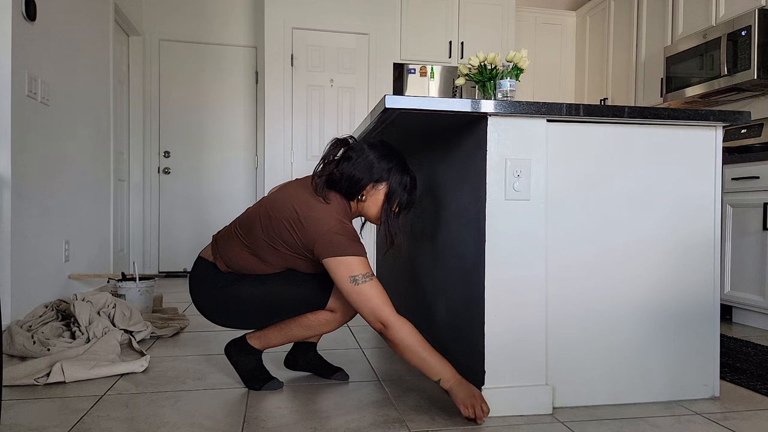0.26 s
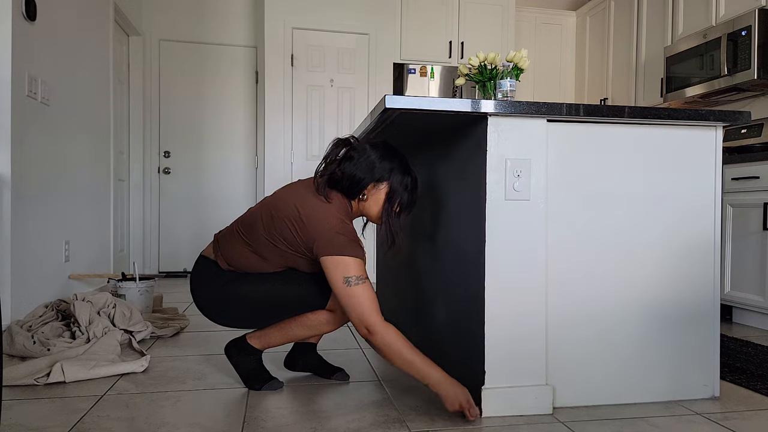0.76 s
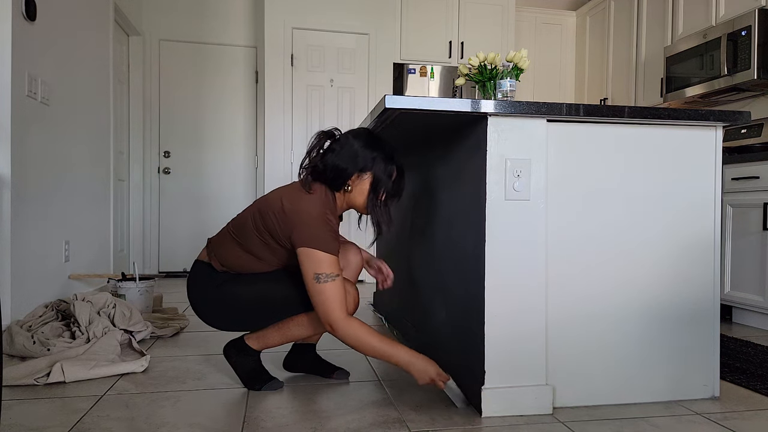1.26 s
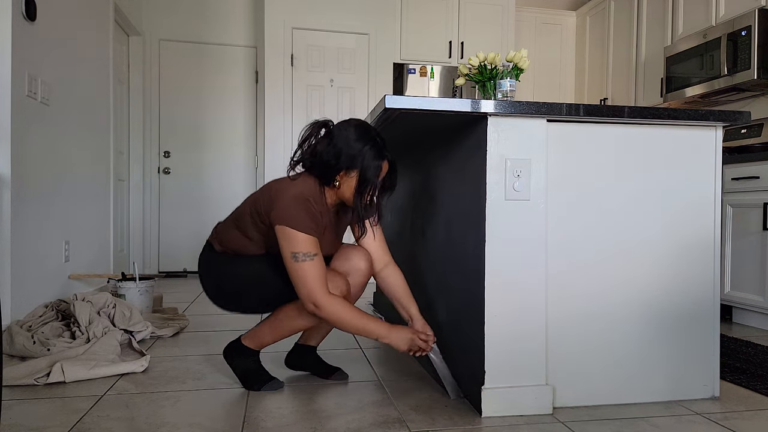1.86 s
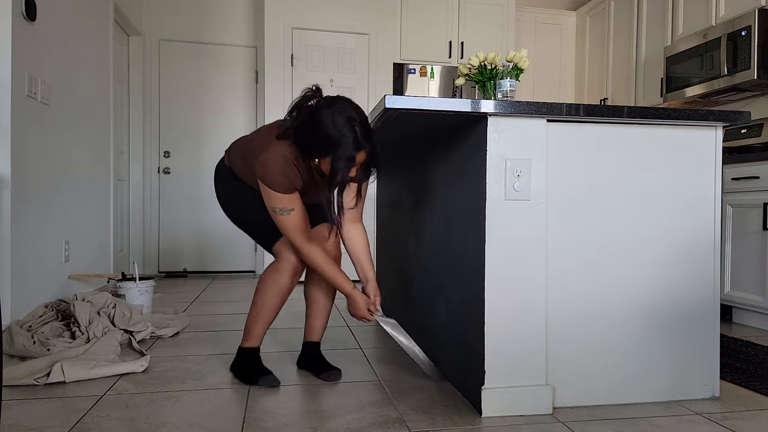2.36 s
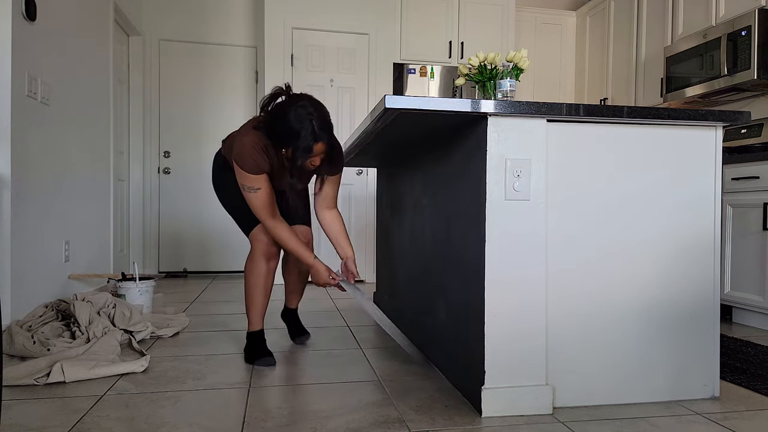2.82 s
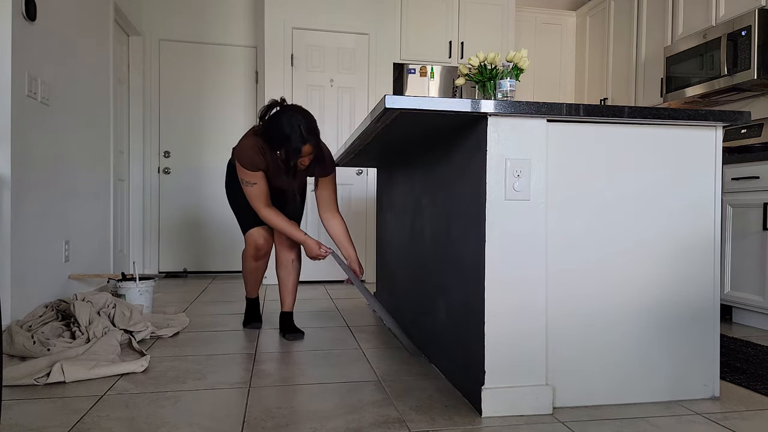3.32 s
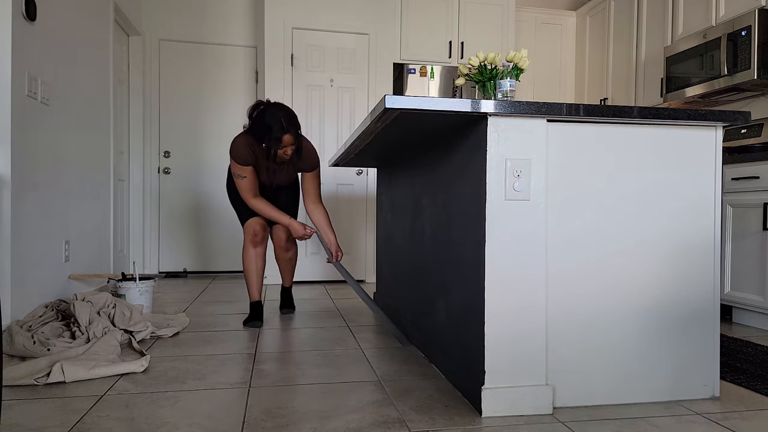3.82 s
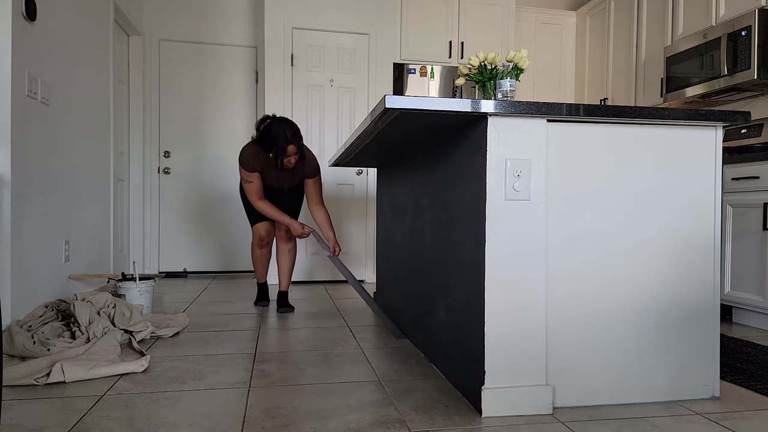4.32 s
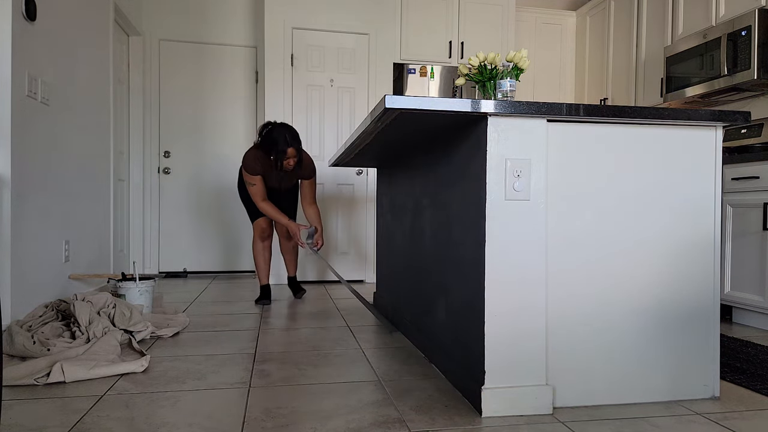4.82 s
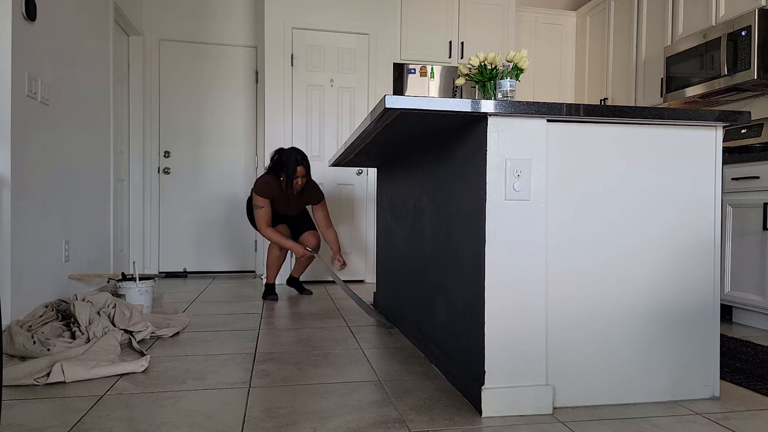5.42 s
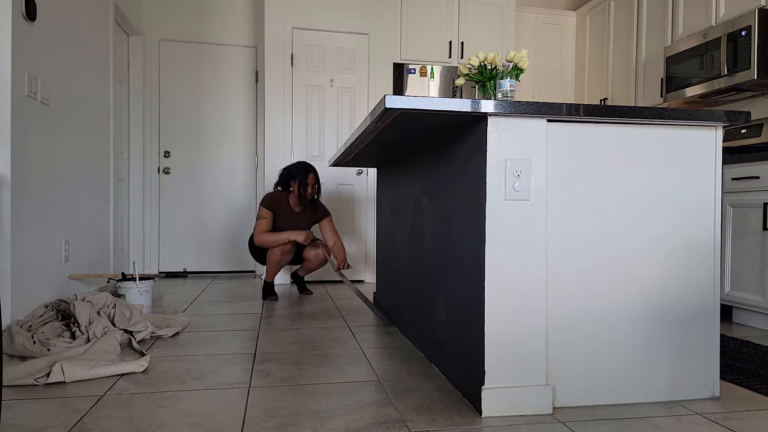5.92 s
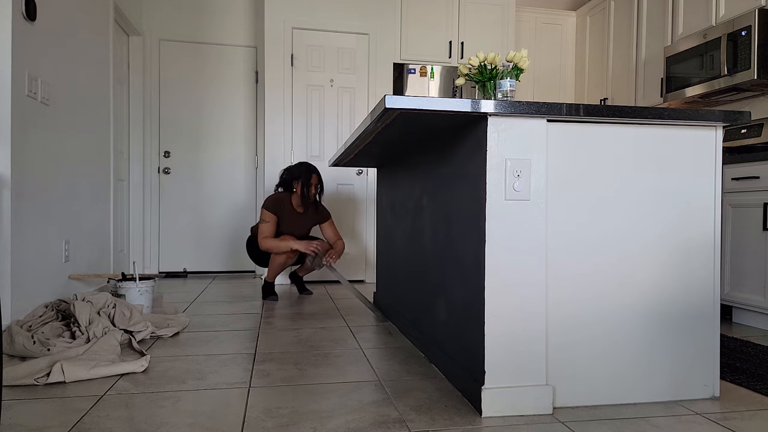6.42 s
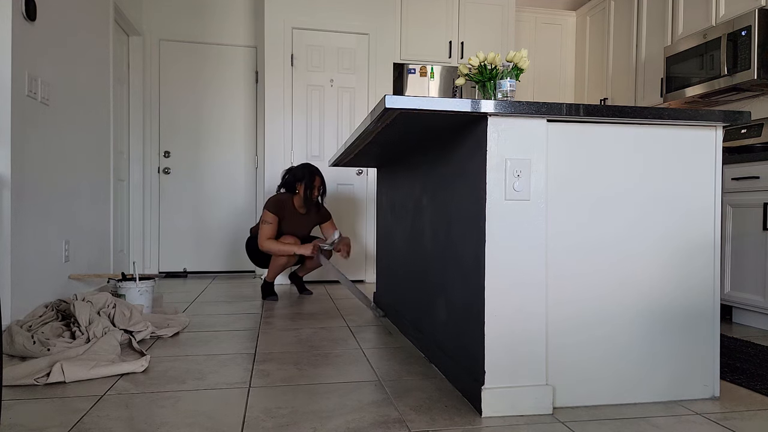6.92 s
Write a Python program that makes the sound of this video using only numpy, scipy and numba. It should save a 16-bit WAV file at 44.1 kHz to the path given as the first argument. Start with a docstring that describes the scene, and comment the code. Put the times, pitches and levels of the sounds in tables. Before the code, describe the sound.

Masking tape rips steadily from the floor in a bright, hard room, ticking and crinkling, then one sudden loud yank cracks loose.

```python
"""Painter's tape is peeled off a tiled floor along a kitchen island, moving away from the listener.
The glue lets go in countless tiny clicks, shaped by the tape; larger slips tick on top.
The freed strip gives falling notes, made by resonators, and squeals once when pulled taut.
One hard yank tears a long stretch loose with a burst of cracks and thumps the panel.
Slack tape crinkles, feet knock and rumble softly, and a bright room echoes over hum and hiss."""
import sys
import numpy as np
from scipy import signal
from scipy.fft import rfft, irfft, next_fast_len
from scipy.io import wavfile
from scipy.ndimage import map_coordinates
from numba import njit

SR = 44100
rng = np.random.default_rng(int(sys.argv[2]) if len(sys.argv) > 2 else 0)


def wav_out(sig):
    """Save sig, one row per channel (or a flat mono array), as 16-bit PCM at SR to the path in sys.argv[1]."""
    wavfile.write(sys.argv[1], SR, np.round(np.clip(np.atleast_2d(sig).T, -1, 1) * 32767).astype(np.int16))


N = 316230  # length in samples

# How long the room echoes. Each row: frequency in Hz, time to fade by 60 dB in seconds.
ROOM_FADE = [(100, 0.36), (500, 0.52), (3000, 0.46), (6000, 0.32), (12000, 0.24)]
# Width of the microphone pair. Each row: frequency in Hz, gain of the left-right difference in dB.
WIDTH = [(60, -14), (250, -5), (700, -1), (2000, 1.5), (6500, 1)]
TOP_HZ = 16000  # nothing is heard above this

# Colour of the low rumble of the room. Each row: frequency in Hz, relative level in dB per Hz.
RUMBLE_COLOUR = [(20, -35), (45, 5), (70, 3.5), (110, -2.5), (200, -24), (600, -59), (1500, -120)]
# Colour of the faint hiss. Each row: frequency in Hz, relative level in dB per Hz.
HISS_COLOUR = [(100, 0), (260, -5), (600, -12), (1200, -19), (1800, -26), (3500, -26), (5000, -31),
               (13000, -37), (16000, -44)]
HISS_DB = -69
# Appliance hum. Each row: pitch in Hz before it wavers, level in dB.
HUM = [(48.4, -77), (170, -84)]

# Colour of the floor under the feet. Each row: frequency in Hz, relative level in dB per Hz.
FOOTING_COLOUR = [(20, -25), (45, -1), (68, 3.5), (110, -3), (200, -29), (600, -58)]
# Shifts of weight while rising from the crouch. Each row: middle in seconds, half length in seconds,
# level in dB.
SHIFTS = [(0.654, 0.099, -59), (0.947, 0.13, -60.5), (1.22, 0.097, -68), (1.772, 0.27, -64),
          (2.6, 0.32, -68)]
# Soft knocks of feet and hand. Each row: start in seconds, level in dB before the soft attack,
# pitch in Hz before it is blurred, time to fade by 60 dB in seconds.
KNOCKS = [(1.035, -42, 231.7, 0.19), (2.95, -48.5, 234, 0.21), (3.58, -52, 295.8, 0.2),
          (4.07, -50, 35.01, 0.84), (4.09, -49, 64, 0.48), (4.47, -47.5, 65.7, .35)]
# Notes of the panel, set going by the yank. Each row: pitch in Hz before it is blurred,
# level in dB before the soft attack, time to fade by 60 dB in seconds.
PANEL = [(65.9, -41, 0.63), (96.5, -39, 0.45), (142, -43, 0.29), (386, -45, 0.69)]

# Colour of crinkling slack tape. Each row: frequency in Hz, relative level in dB per Hz.
SLACK_COLOUR = [(150, -26), (500, -5), (1250, -2.5), (1900, 0.5), (3400, 2), (4400, -1.5), (5500, -11),
                (7500, -9), (16000, -24)]
# The fingers flex the slack tape. Each row: start in seconds, level in dB, rise in seconds,
# time to fade by 60 dB in seconds, hollow note in Hz, its level against the crinkle in dB,
# crisp ring in Hz, its level against the crinkle in dB.
FLEXES = [(0.056, -62, 0.0015, 0.15, 727, -14, 3560, -14), (.128, -55.5, 0.0045, 0.19, 710, 0, 3560, -5),
          (0.751, -42, 0.017, 0.6, 710, -19, 2660, -7), (5.226, -47, 0.017, 0.49, 1252, -20, 3214, 5),
          (5.355, -41.5, 0.037, 0.23, 878, -5.5, 3400, -13)]

# Squeal of the taut strip. Each row: time in seconds, pitch in Hz before it trembles.
SQUEAL_PITCH = [(1.37, 320), (1.43, 364), (1.55, 418), (1.65, 356)]
SQUEAL_START_S, SQUEAL_END_S, SQUEAL_RISE_S, SQUEAL_T60_S = 1.365, 1.46, 0.06, 0.85
# The strip is held tight. Each row: middle in seconds, half length in seconds, level in dB.
STRETCHES = [(.83, .06, -49), (2.695, 0.043, -50), (4.12, .11, -48), (4.45, 0.2, -47)]
# Falling notes of the freed strip. Each row: start in seconds, end in seconds, first pitch in Hz,
# last pitch in Hz, level in dB before the rise and fade.
STRIP_NOTES = [(0.533, 0.694, 1720, 560, -53), (0.702, .77, 680, 432, -63), (0.832, 0.993, 744, 262, -61)]

# Colour of the yank. Each row: frequency in Hz, relative level in dB per Hz.
YANK_COLOUR = [(71, -49), (120, -9), (217, -15.5), (392, -9.5), (481, -12), (769, -6.5), (925, -2),
               (1340, 0), (1570, 7), (2010, -0.5), (4020, -3.5), (5200, -8.5), (7000, -8.5), (10500, -12),
               (14000, -11), (15800, -22)]
# Ringing of the stretched tape. Each row: centre in Hz, width in Hz, relative level in dB.
TAUT_RINGS = [(772.5, 137, 4.5), (1609, 117, 9), (3400, 870, 5), (4230, 270, -11)]
# The yank: a brief onset, then a sharp crack together with a tear that holds, sagging, and dies away.
YANK_S, YANK_ONSET_S, YANK_HOLD_S, YANK_T60_S, CRACK_T60_S = 5.6395, 0.01024, 0.058, 0.17, 0.044
YANK_DB, YANK_SAG_DB, CRACK_DB, ONSET_DB = -16.5, -3, -17.5, -24

# Firmly stuck patches. Each row: middle in seconds, half length in seconds, level in dB, centre in Hz.
FLURRIES = [(0.511, 0.023, -36.5, 6700), (0.617, 0.031, -38.5, 13100), (0.882, 0.025, -48, 12970),
            (1.189, 0.069, -54, 6500), (1.53, 0.07, -48, 6440), (1.992, 0.025, -42, 8010),
            (2.391, 0.029, -58, 12460), (2.65, .018, -44, 12540), (2.882, 0.088, -58, 7006),
            (6.888, 0.019, -62, 11970), (7.153, 0.017, -49, 8530)]
# Colour of the tape as the glue breaks. Each row: frequency in Hz, relative level in dB per Hz.
TAPE_COLOUR = [(71, -58), (120, -48), (150, -24), (392, -13), (491, -10.5), (785, -10), (1280, -5),
               (2220, -5), (3210, -2), (4400, -6), (6700, -15), (7730, -12), (10900, -19.5), (14300, -18.5),
               (15800, -23)]
# Single larger slips. Each row: time in seconds, peak in dB before a shared gain and bass cut,
# treble in dB before a shared lift.
SLIPS = [(.369, -43, -4), (.394, -43, -6), (.479, -25, -2), (.4875, -27, -6), (.4935, -26, -8),
         (.568, -23, -14), (.6305, -27, -2), (.7498, -32, -3), (.8385, -31, -10), (.853, -27, -9),
         (1.4015, -23.5, 0), (1.852, -41, -4), (1.89, -33, -6), (1.928, -32, -12), (1.941, -34, -12),
         (1.9797, -28, -4), (2.4862, -33, -8), (2.585, -30, -9), (2.6542, -30, -4), (2.827, -31, -9),
         (3.344, -34, -10), (3.437, -33, -5), (3.4495, -32, -8), (3.561, -32, -11), (3.7073, -31, -11),
         (3.847, -27, -9), (3.857, -28, -8), (4.7348, -33, -9), (4.8063, -30, -11), (4.9945, -29, -15),
         (5.0335, -31, -15), (5.061, -30, -18), (5.0718, -30, -18), (5.232, -41, -18), (5.2545, -38, -18),
         (5.5745, -46, -13), (6.153, -31, -12), (6.521, -25, -15), (6.5715, -25, -14), (6.73, -28, -10),
         (6.892, -26, -8), (7.019, -28, -18), (7.0755, -31, -16), (7.1378, -28, -14)]

# Pulls of the hand, each dying away afterwards. Each row: start in seconds, end in seconds,
# level in dB before tugs and mixing, swell by the end in dB, rise in seconds,
# time to fade by 60 dB in seconds, then sizzle, bite and body in dB before shared offsets.
PULLS = [(0.352, 0.403, -66.5, -2.5, 0.02, 0.092, 17.5, -15, 4),
         (0.474, 0.621, -43.5, 0.5, 0.018, 0.42, -2.5, 8.5, -2),
         (0.831, 1.331, -39.5, -11, 0.05, 0.09, -2, -1.5, -0.5),
         (1.394, 1.68, -48, 5, 0.0037, 0.098, -1, -0.5, 1),
         (1.721, 1.818, -50, -5, 0.014, 0.35, -2, 3.5, 4.5),
         (1.886, 2.443, -46, 6, 0.0055, 0.11, -2, -0.5, -1.5),
         (2.475, 3.389, -45, 1, 0.023, 0.11, -1.5, 0, -0.5),
         (3.428, 3.818, -45.5, 2, 0.011, 0.081, -2.5, 1, -1),
         (3.846, 4.652, -40, 1.3, 0.0041, 0.13, 0, 0.5, -4.5),
         (4.71, 5.049, -42.5, -4, 0.023, 0.52, 1.5, 4, -1),
         (5.235, 5.298, -55, 2.5, 0.017, 0.17, 5.5, -4, 4.5),
         (5.326, 5.397, -50, -0.5, 0.026, 0.49, -5, -1, 6.5),
         (5.736, 6.055, -41.5, -1, 0.033, 0.13, -0.5, 2.5, -1.5),
         (6.113, 6.692, -43.5, -3, 0.037, 0.19, 4, 6, 0), (6.733, 7.092, -43, -1, 0.0034, 0.15, 0, 2, -1.5),
         (7.138, 7.175, -42, 1, 0.0031, 0.13, -3, 6.5, 5.5)]
# Within a pull the hand tugs harder (+) or eases off (-). Each row: middle in seconds,
# half length in seconds, change of force in dB.
TUGS = [(1.073, 0.2, 5), (1.504, 0.041, -4), (1.663, 0.052, 2.5), (2.002, 0.019, 6), (2.062, 0.019, 0),
        (2.159, 0.054, 4.5), (2.552, 0.064, 2), (2.679, 0.046, 5.5), (2.971, 0.074, -3),
        (3.206, 0.063, 5.5), (3.717, 0.032, 3.5), (3.922, 0.054, -6), (4.081, 0.064, 1.5),
        (4.917, 0.05, 3.5), (5.939, 0.035, 2.5), (6.515, 0.018, 6), (6.588, 0.04, 7), (6.762, 0.042, -4),
        (6.855, 0.061, 5)]
SET_OFF_S, RECEDE_S = 0.86, 7  # when the peel sets off, and how long until it is far
# Shared offsets for the sizzle and papery body close by, and what each loses with distance
SIZZLE_DB, SIZZLE_LOSS_DB, BODY_DB, BODY_LOSS_DB = 10, 6.5, -0.5, 1.5
STEADY_PULL_DB = -43  # level of a pull at normal speed
RASP_DB, TICKS_DB = -2, -4.5  # fine threads and jumps of the peeling edge, against the pull


def amp(db):
    """Turn decibels into a gain."""
    return 10 ** (np.asarray(db) / 20)


def unit(x):
    """Scale to an rms level of 1."""
    return x / np.sqrt(np.mean(x ** 2) + 1e-20)


def along(points, hz):
    """Read (Hz, value) points on a log frequency axis."""
    f, v = np.transpose(points)
    return np.interp(np.log(hz + 1), np.log(f + 1), v)


def curves(rows):
    """Give one value per sample for each column after the time."""
    s, *columns = np.transpose(rows)
    return [np.interp(np.arange(N) / SR, s, column) for column in columns]


def wobble(rate):
    """Make a smooth random curve from rate random points a second."""
    points = rng.standard_normal(int(N * rate / SR) + 4)
    return map_coordinates(points, [np.arange(N) * rate / SR])


def envelope(start, end, rise, t60, swell_db=0):
    """Gain that rises, holds until the end while swelling or sagging, then dies away."""
    t = np.arange(N) / SR
    held = np.clip((t - start) / max(end - start, 1e-3), 0, 1)
    fade_db = 60 * np.maximum(t - end, 0) / t60
    return np.clip((t - start) / rise, 0, 1) * amp(swell_db * held - fade_db)


def swell(middle, half):
    """A smooth hump of height 1 around a moment."""
    return np.exp(-np.minimum(((np.arange(N) / SR - middle) / half) ** 2, 50))


def add(track, s, sound):
    """Mix a sound into a track at time s."""
    part = track[max(round(s * SR), 0):][:len(sound)]
    part += sound[:len(part)]


def filtered(x, gain):
    """Shape x by a gain that depends on frequency."""
    m = next_fast_len(N + SR // 2)  # spare room so that the ringing does not wrap round
    return irfft(rfft(x, m) * gain(np.fft.rfftfreq(m, 1 / SR)), m)[..., :N]


def coloured(x, points, size=4096):
    """Give x a (Hz, dB) colour with no sound ahead of a click, so that clicks keep their attack."""
    cepstrum = irfft(np.log(amp(along(points, np.fft.rfftfreq(size, 1 / SR)))))
    # Folding the cepstrum forward in time gives a minimum-phase filter
    cepstrum[1:size // 2] *= 2
    cepstrum[size // 2 + 1:] = 0
    return signal.fftconvolve(x, irfft(np.exp(rfft(cepstrum))))[:len(x)]


def band(x, edge_hz, kind):
    """Keep the part of x above ("high") or below ("low") an edge."""
    edge = min(edge_hz, SR / 2 - 1)
    return signal.sosfiltfilt(signal.butter(2, edge, kind, fs=SR, output="sos"), x)


def ringing(x, modes):
    """Send x through fixed resonances, each with a centre in Hz, a width in Hz and a level in dB."""
    def gain(f):
        total = 0
        for k, (centre, width, db) in enumerate(modes):
            peak = 1j * f * width / (centre * centre - f * f + 1j * f * width)
            total = total + (-1) ** k * amp(db) * peak  # neighbours take opposite signs
        return total
    return filtered(x, gain)


@njit
def resonator(x, angle, radius):
    """A two-pole resonance whose pitch moves: each output builds on the last two."""
    y = np.zeros(len(x))
    for i in range(2, len(x)):
        memory = 2 * radius * np.cos(angle[i]) * y[i - 1] - radius * radius * y[i - 2]
        y[i] = x[i] * np.sin(angle[i]) + memory
    return y


def crackle(rate, spread_db):
    """Threads break at random, about rate a second: many small, a few large."""
    breaks = rng.random(N) < rate / SR
    size = amp(spread_db * np.minimum(rng.standard_normal(N), 2.4))
    return unit(breaks * size * rng.choice([-1, 1], N) / np.sqrt(rate))


def narrowed(pair, side_db):
    """Scale the left-right difference by a gain in dB that depends on frequency."""
    mid = (pair[0] + pair[1]) / 2
    side = filtered((pair[0] - pair[1]) / 2, lambda hz: amp(side_db(hz)))
    return np.array([mid + side, mid - side])


def path_from(lag_ms, early_db, early_t60, wet_db, dull=0.017):
    """Stereo path from one spot: direct sound (left late by the lag), nearby surfaces, then the room."""
    hz, t, z = signal.stft(rng.standard_normal((2, SR // 2)), SR, nperseg=256)
    fade = amp(-60 * t / along(ROOM_FADE, hz)[:, None])
    tail = signal.istft(z * fade, SR, nperseg=256)[1]
    t = np.arange(tail.shape[1]) / SR
    tail *= np.clip(t / 0.01, 0, 1)
    sparse = rng.random(tail.shape) < .1
    early = rng.standard_normal(tail.shape) * sparse * amp(-60 * t / early_t60)
    early /= np.linalg.norm(early, axis=1, keepdims=True)
    echoes = amp(early_db) * early + amp(wet_db) * tail / np.linalg.norm(tail[0])
    echoes = signal.lfilter([1 - dull], [1, -dull], echoes)  # the echoes lose a little treble
    ear_delay = np.array([[lag_ms], [-lag_ms]]) / 2000
    direct = np.sinc((t - .0005 - ear_delay) * SR)
    return (direct + echoes) / np.sqrt(1 + amp(early_db) ** 2 + amp(wet_db) ** 2)


def placed(x, lag_ms, early_db, early_t60, wet_db, drift_ms=0, count=1):
    """Put x in the kitchen; a moving source glides through count spots, each with its own lag and echoes."""
    out, place = np.zeros((2, N + SR)), np.linspace(0, count - 1, N)
    for k in range(count):
        near = np.arange(*np.searchsorted(place, [k - 1, k + 1]))
        share = np.cos(np.pi / 2 * (place[near] - k))  # fades between neighbouring spots
        path = path_from(lag_ms + drift_ms * k / count, early_db, early_t60, wet_db)
        heard = signal.fftconvolve((x[near] * share)[None], path, axes=1)
        out[:, near[0]:near[0] + heard.shape[1]] += heard
    return out[:, :N]


def room_tone(rumble_db=-73.5):
    """A steady low rumble and an appliance's wavering hum, with faint hiss that differs left and right."""
    hiss = np.array([unit(coloured(rng.standard_normal(N), HISS_COLOUR)) for _ in range(2)])
    rumble = unit(coloured(rng.standard_normal(N), RUMBLE_COLOUR))
    hum = np.zeros(N)
    for hz, db in HUM:
        phase = 2 * np.pi * hz * np.arange(N) / SR + .5 * wobble(3.6)
        hum += amp(db) * unit(np.sin(phase))
    return amp(HISS_DB) * hiss + amp(rumble_db) * rumble + hum


def shuffle():
    """The floor rumbles softly as the weight shifts on stockinged feet: low noise in smooth humps."""
    rumble = unit(coloured(rng.standard_normal(N), FOOTING_COLOUR))
    return rumble * sum(amp(db) * swell(s, half) for s, half, db in SHIFTS)


def thumps(attack=0.008, blur=0.89):
    """Soft blows on floor and panel: low, fading tones whose phase wanders."""
    track, t = np.zeros(N), np.arange(SR) / SR
    panel_blows = [(YANK_S, db, hz, t60) for hz, db, t60 in PANEL]
    for s, db, hz, t60 in list(KNOCKS) + panel_blows:
        phase = 2 * np.pi * hz * t + blur * wobble(hz / 2)[:SR]
        add(track, s, np.sin(phase) * amp(db - 60 * t / t60) * (1 - np.exp(-t / attack)))
    return track


def flexes(hollow_width_hz=110, crisp_width_hz=240):
    """Slack tape crinkles; each bend has its own hollow note and crisp, papery ring."""
    crinkle, out = unit(coloured(crackle(2100, 1.5), SLACK_COLOUR)), np.zeros(N)
    for s, db, rise, t60, hollow_hz, hollow_db, crisp_hz, crisp_db in FLEXES:
        hollow = unit(ringing(crinkle, [(hollow_hz, hollow_width_hz, 0)]))
        crisp = unit(ringing(crinkle, [(crisp_hz, crisp_width_hz, 0)]))
        bend = unit(crinkle + amp(hollow_db) * hollow + amp(crisp_db) * crisp)
        out += amp(db) * envelope(s, s + rise, rise, t60) * bend
    return out


def squeal(jitter=0.018, octave_db=-15, level_db=-58.5):
    """The taut strip sings for a moment: a trembling tone and its octave, uneven in level."""
    hz, = curves(SQUEAL_PITCH)
    phase = 2 * np.pi * np.cumsum(hz * (1 + jitter * wobble(130))) / SR
    tone = unit(np.sin(phase) + amp(octave_db) * np.sin(2 * phase))
    level = envelope(SQUEAL_START_S, SQUEAL_END_S, SQUEAL_RISE_S, SQUEAL_T60_S)
    return tone * level * amp(level_db + 2.3 * wobble(59.6))


def sing(hz=3330, width_hz=480):
    """The tightly stretched strip rings at one steady pitch, set going by tiny snaps."""
    narrow = ringing(crackle(5000, 1.5), [(hz, width_hz, 0)])
    note = unit(ringing(narrow, [(hz, 3 * width_hz, 0)]))
    return note * sum(amp(db) * swell(s, half) for s, half, db in STRETCHES)


def strip(width_hz=360, rise=0.025, t60=0.19):
    """Tiny snaps pluck the freed strip, whose note falls as it lengthens."""
    t, radius, out = np.arange(N) / SR, np.exp(-np.pi * width_hz / SR), np.zeros(N)
    for start, end, from_hz, to_hz, db in STRIP_NOTES:
        hz = from_hz * (to_hz / from_hz) ** np.clip((t - start) / (end - start), 0, 1)
        angle = 2 * np.pi * hz / SR
        note = resonator(resonator(crackle(2500, 2.6), angle, radius), angle, radius)
        out += unit(band(note, 180, "high")) * amp(db) * envelope(start, end, rise, t60)
    return out


def yank(ring_db=-8, rise=0.0011, ragged_db=2.6):
    """A long stretch tears loose at once: dense snaps that also ring the stretched tape."""
    onset_s = YANK_S - YANK_ONSET_S
    onset = amp(ONSET_DB) * envelope(onset_s, onset_s, rise, CRACK_T60_S)
    crack = amp(CRACK_DB) * envelope(YANK_S, YANK_S, rise, CRACK_T60_S)
    hold = amp(YANK_DB) * envelope(YANK_S, YANK_S + YANK_HOLD_S, rise, YANK_T60_S, YANK_SAG_DB)
    level = (onset + crack + hold) * amp(ragged_db * wobble(140))
    snaps = crackle(10000, 2.0)
    tear = unit(coloured(snaps, YANK_COLOUR))
    ring = unit(ringing(snaps, TAUT_RINGS))
    return unit(tear + amp(ring_db) * ring) * level


def flurries(rate=1400, spread_db=3, width_hz=4500):
    """Firmly stuck patches come away in a bright spit of tiny snaps."""
    snaps, out = band(crackle(rate, spread_db), 2900, "high"), np.zeros(N)
    for s, half, db, hz in FLURRIES:
        out += unit(ringing(snaps, [(hz, width_hz, 0)])) * amp(db) * swell(s, half)
    return out


def slips(gain_db=1, t60=.009, fray=.4, treble_db=10):
    """A larger patch of glue lets go with one thin, dry tick and a short fray of last threads."""
    track, t = np.zeros(N), np.arange(SR // 20) / SR
    for s, db, bright_db in SLIPS:
        threads = fray * rng.standard_normal(len(t)) * amp(-60 * t / t60)
        tick = coloured((t == 0) + threads, TAPE_COLOUR)
        tick = tick + band(tick, 4500, "high") * (amp(bright_db + treble_db) - 1)
        add(track, s, amp(db + gain_db) * tick / np.abs(tick).max())
    return band(track, 1100, "high")


def hand(flutter_db=0.35):
    """Strength of the pull as a gain, and the sizzle, bite and body in dB of the latest pull."""
    pull = np.zeros(N)
    for start, end, db, swell_db, rise, t60, *_ in PULLS:
        pull += amp(db) * envelope(start, end, rise, t60, swell_db)
    force_db = sum(db * swell(s, half) for s, half, db in TUGS) + flutter_db * wobble(55)
    starts, *_, sizzle, bite, body = np.transpose(PULLS)
    current = np.maximum(np.searchsorted(starts, np.arange(N) / SR) - 1, 0)
    return pull * amp(force_db), sizzle[current], bite[current], body[current]


def peeled(pull):
    """The length freed so far, in seconds of peeling at normal speed."""
    return np.cumsum(np.minimum(pull / amp(STEADY_PULL_DB), 1)) / SR


def stick_slip(rate, jitter, spread_db):
    """The edge sticks and jumps at an uneven pace, about rate times a second."""
    turns = np.floor(np.cumsum(rate * np.exp(jitter * wobble(240))) / SR)
    jumps = np.diff(turns, prepend=0)
    size = amp(spread_db * np.minimum(rng.standard_normal(N), 1.7))
    return unit(jumps * size * rng.choice([-1, 1], N) / np.sqrt(rate))


def glue(pull, rate=3000, spread_db=2.5, slip_rate=230, jitter=.5, slip_spread_db=4.0):
    """Fine threads snap and the peeling edge jumps ahead; both come thicker as the pull grows."""
    speed = np.clip(pull / amp(STEADY_PULL_DB), amp(-13.5), amp(3.5))
    return crackle(rate * speed, spread_db), stick_slip(slip_rate * speed, jitter, slip_spread_db)


def peel(breaks, pull, sizzle, bite, body, bite_db=1, stub_s=0.036):
    """The paper backing sounds the breaking glue; sizzle and body thin out with distance."""
    far = np.clip((np.arange(N) / SR - SET_OFF_S) / RECEDE_S, 0, 1)
    rasp = unit(coloured(breaks, TAPE_COLOUR))
    treble, bass = band(rasp, 6970, "high"), band(rasp, 880, "low")
    edge = band(rasp - treble, 4050, "high")
    more_sizzle = treble * (amp(sizzle + SIZZLE_DB - SIZZLE_LOSS_DB * far) - 1)
    more_body = bass * (amp(body + BODY_DB - BODY_LOSS_DB * far) - 1)
    more_bite = edge * (amp(bite + bite_db) - 1)
    rasp = rasp + more_sizzle + more_body + more_bite
    stub = np.exp(-(peeled(pull) / stub_s) ** 4)  # a short stub of tape gives off little bass
    return ((1 - stub) * rasp + stub * band(rasp, 1000, "high")) * pull


def scene():
    """The peel travels from the right toward the centre; the yank sounds from the left."""
    pull, *colour = hand()
    rasp, ticks = (peel(breaks, pull, *colour) for breaks in glue(pull))
    soft_tape = amp(RASP_DB) * rasp + flexes() + flurries() + sing()
    tape = placed(soft_tape, lag_ms=0.095, drift_ms=-0.072,
                  early_db=5.5, early_t60=0.072, wet_db=-.5, count=40)
    tape = tape + placed(amp(TICKS_DB) * ticks, lag_ms=0.091, drift_ms=-0.066,
                         early_db=1, early_t60=0.061, wet_db=0, count=16)
    # Single slips and the strip's notes are heard drier
    tape = tape + placed(slips() + strip(), lag_ms=0.16, drift_ms=-0.23,
                         early_db=-6, early_t60=.04, wet_db=-5, count=8)
    # Above about 7 kHz left and right sound nearly the same
    tape = narrowed(tape, lambda hz: along([(6900, -2.5), (7700, -25.5)], hz))
    snap = placed(yank(), lag_ms=-0.23, early_db=4.0, early_t60=0.043, wet_db=0.5)
    snap = narrowed(snap, lambda hz: along([(6000, -2.5), (7500, -9)], hz))
    small = placed(thumps() + squeal() + shuffle(), lag_ms=.06,
                   early_db=-4, early_t60=0.035, wet_db=-14.5)
    return tape + snap + small + room_tone()


def record(dry):
    """A close microphone pair: nearly mono in the bass, right a touch louder, cut off at the top."""
    pair = narrowed(dry, lambda hz: along(WIDTH, hz)) * amp([[-.3], [.3]])
    return filtered(pair, lambda hz: 1 / (1 + (hz / TOP_HZ) ** 200))


dry = scene()
out = record(dry)
wav_out(out)
```